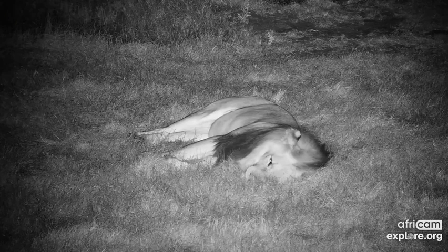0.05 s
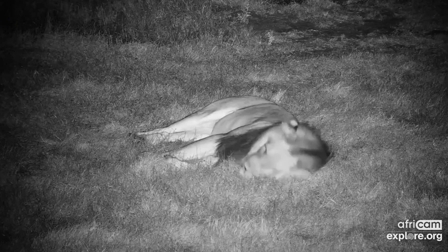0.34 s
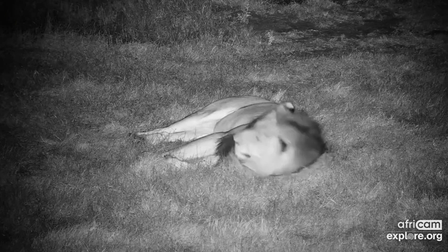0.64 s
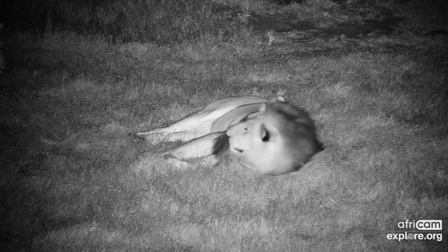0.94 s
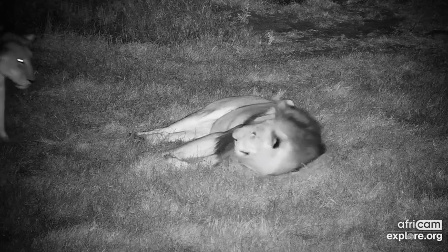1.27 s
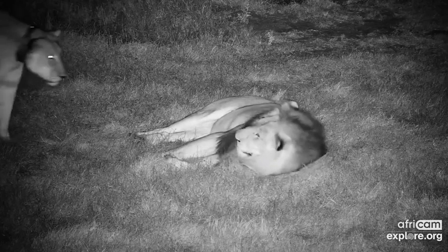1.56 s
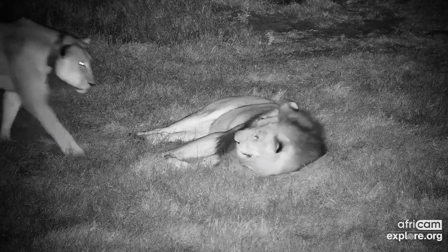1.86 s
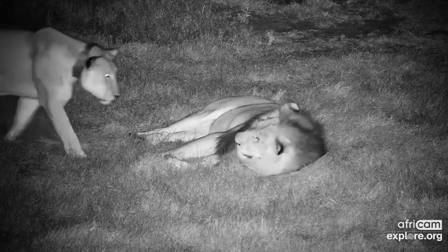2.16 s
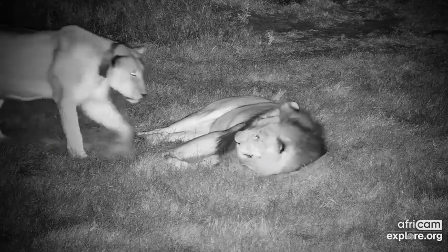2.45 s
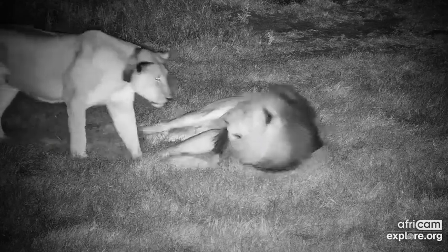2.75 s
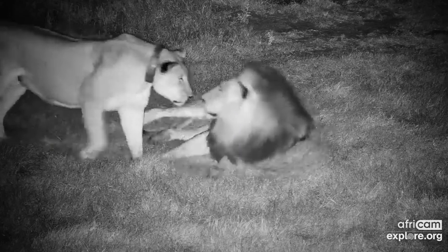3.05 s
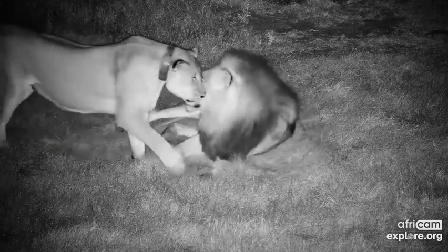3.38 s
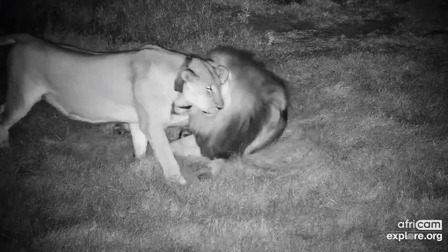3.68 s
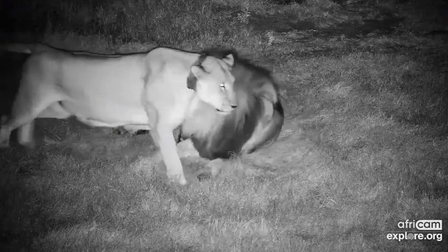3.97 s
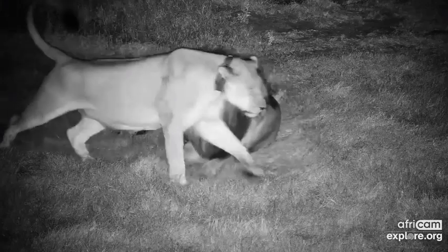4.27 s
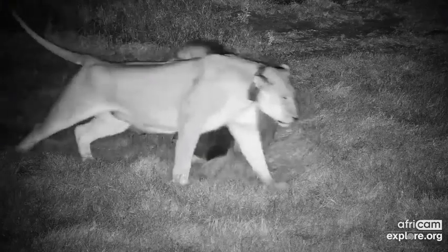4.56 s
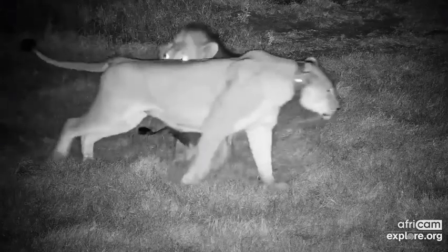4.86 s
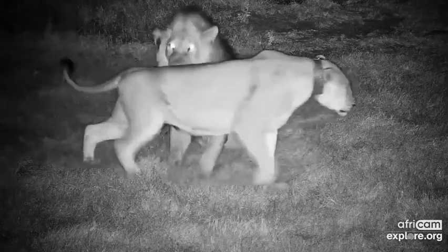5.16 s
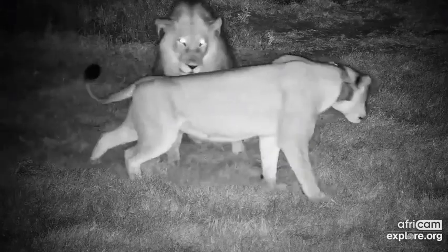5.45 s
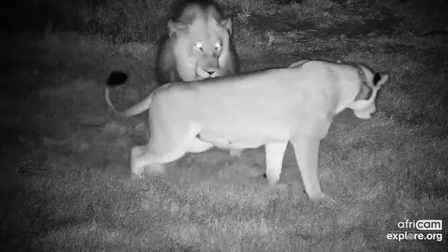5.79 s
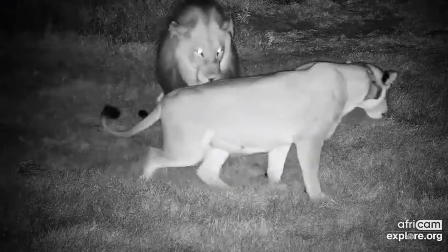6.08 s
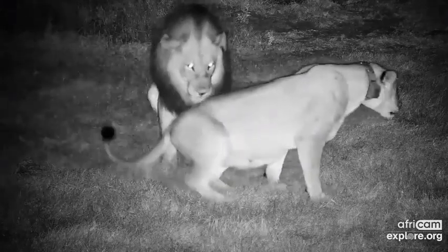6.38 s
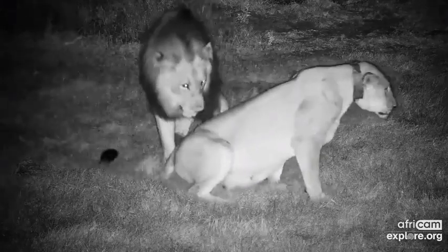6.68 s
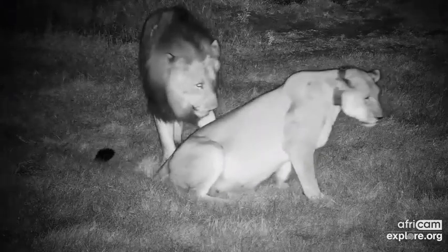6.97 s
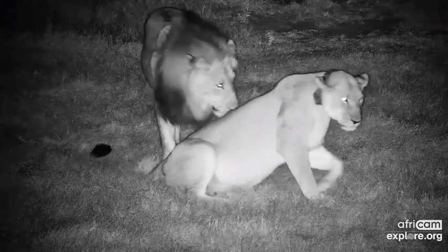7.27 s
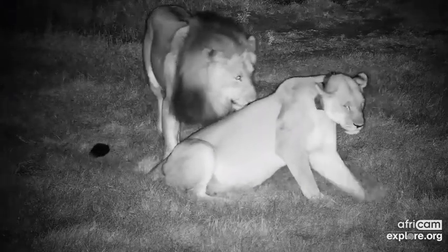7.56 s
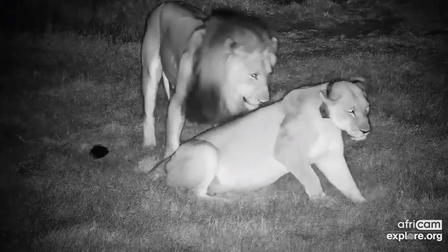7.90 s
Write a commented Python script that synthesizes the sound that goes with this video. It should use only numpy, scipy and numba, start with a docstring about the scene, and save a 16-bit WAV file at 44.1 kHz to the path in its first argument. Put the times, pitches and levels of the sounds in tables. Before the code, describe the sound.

A lion growls in slow, throaty swells over a constant high chorus of frogs, toads and chirping insects.

```python
"""Open bush at night, one distant microphone with faint mains hum.
Toads rattle in overlapping trains of tone pulses, insects rasp, a small caller repeats four falling chirps.
The treble near 5.5 kHz drops out briefly and flickers.
From about 2.7 s a lion growls in swells of effort: slow, separate vocal-fold flaps ring throat and
chest, louder and quicker at each crest, and change colour as the mouth opens."""
import sys
import numpy as np
from scipy import signal
from scipy.fft import rfft, irfft, next_fast_len
from scipy.io import wavfile
from scipy.ndimage import uniform_filter1d
from numba import njit

SR = 44100
rng = np.random.default_rng(int(sys.argv[2]) if len(sys.argv) > 2 else 0)


def dump_mix(stems):
    """Bounce the given channels to the path in sys.argv[1] as a 16-bit WAV at rate SR."""
    frames = np.atleast_2d(stems).T  # one column per channel
    limited = np.clip(frames, -1, 1)  # hard clip at full scale
    pcm = np.round(limited * 32767).astype(np.int16)
    wavfile.write(sys.argv[1], SR, pcm)


N = 349713
TIME = np.arange(N) / SR

# noise spectra: f/Hz, relative density/dB
AIR_SPECTRUM = [(20, -6), (70, -7), (130, -3), (210, -1.5), (290, -3.5), (370, -3.5), (600, 1), (760, 2),
                (1050, -0.5), (1270, -2), (2500, 7), (3600, -13.5), (7000, -10), (12500, -11)]
FROG_SPECTRUM = [(1300, -21.5), (1480, -7), (1650, 12.5), (1820, -5.5), (2000, 2), (2130, 0.5), (2480, 3.5),
                 (2700, -11), (2950, 0.5), (3170, -18), (3330, -3), (3550, -22.5), (3750, -22.5),
                 (3950, -3.5), (4300, -75)]
INSECT_SPECTRUM = [(3900, -34.5), (4250, -11), (4550, -4), (4950, 3), (5200, 0.5), (5380, 0), (5500, -36),
                   (5800, -50), (6050, 2.5), (6450, -7), (6700, -8.5), (7000, -21.5), (7800, -23)]
# hum lines: f/Hz, level/dB
HUM_LINES = [(50, -77.5), (100, -78), (150, -80.5), (250, -78), (290, -77)]
# the treble near 5.5 kHz drops out briefly: start/s, end/s
TREBLE_DROPOUTS = [(0, .023), (.048, .075), (.192, .215), (.482, .507), (.842, .868), (1.2, 1.224),
                   (1.61, 1.75), (1.779, 1.801), (2.043, 2.086), (2.452, 2.475), (2.592, 2.616),
                   (2.64, 2.665), (2.86, 2.886), (2.906, 2.931), (3.122, 3.286), (3.51, 3.555),
                   (3.65, 3.695), (3.72, 3.77), (3.94, 3.986), (4.13, 4.177), (4.293, 4.322),
                   (4.347, 4.414), (4.73, 4.753), (5.232, 5.257), (5.303, 5.329), (5.428, 5.473),
                   (5.5, 5.523), (5.69, 5.76), (6.002, 6.07), (6.41, 6.46), (6.48, 6.527), (6.553, 6.578),
                   (6.698, 6.746), (6.837, 6.863), (6.89, 6.914), (7.036, 7.102), (7.54, 7.574),
                   (7.632, 7.657), (7.68, 7.73), (7.796, 7.846)]
# four-note calls: start/s
CALL_STARTS_S = [-.063, .365, .75, 1.22, 1.613, 1.991, 2.393, 2.8, 3.162, 3.551, 4.018, 4.383, 4.761, 5.138,
                 5.591, 5.988, 6.403, 6.78, 7.144, 7.532, 7.9]
# notes within a call: delay/s
NOTE_DELAYS_S = (.001, .044, .088, .133)
# far toad groups: f/Hz, spread/Hz, pulse rate/Hz, level/dB
FAR_TOADS = [(1637, 88, 47, -58.8), (2006, 7.3, 48, -68), (2370, 88, 60, -65)]
# near toads: start/s, end/s, f/Hz, pulse rate/Hz, relative level/dB, roughness/cycles, fall/(Hz/s)
NEAR_TOADS = [(-0.1, 3.95, 1660, 55.5, -56.2, .15, 0), (5.3, 7.7, 1660, 55.3, -56.2, .15, 0),
              (-0.1, 4.5, 2335, 45.4, -55.6, .08, 42000), (4.4, 5.8, 2270, 45.4, -58, .08, 30000),
              (5.7, 8.2, 2260, 45.35, -55.7, .06, 10000), (5.7, 8.2, 2440, 45.4, -61, .1, 0),
              (-0.1, 8.2, 2370, 50.45, -56.4, .06, 0), (1.3, 8.2, 2480, 48.4, -63.5, .15, 0),
              (3.9, 5.35, 1630, 48, -58, .25, 0)]
# throat resonances, mouth shut: f/Hz, width/Hz, gain/dB
THROAT_MODES = [(513, 336, -7.5), (747, 320, -1), (994, 240, -16)]
# resonances, mouth open: start/s, end/s, low f/Hz, high f/Hz, low gain/dB, mid gain/dB, high gain/dB
MOUTH_OPENINGS = [(2.58, 2.77, 524, 1370, -10, 1, 1), (3.2, 4.0, 480, 1116, -11, -1, -7),
                  (4.37, 4.76, 484, 1160, -5.5, -14, 1), (5.42, 5.62, 483, 1220, -4, -7, -12.5),
                  (5.92, 6.39, 572, 920, -3.5, -1, -9), (6.35, 6.55, 500, 1250, -0.5, -18, -16),
                  (6.51, 6.78, 456, 870, -1.5, -4, -9), (7.26, 7.49, 473, 1170, 0, -20, -6),
                  (7.45, 7.8, 500, 1100, 2.5, -30, -12), (7.76, 8.1, 486, 1350, -3, -11, -7.5)]
# growls, relative levels: start/s, crest/s, end/s, flap count, voice/dB, chest/dB, rasp/dB
GROWL_SWELLS = [(2.671, 2.675, 2.712, 2, -58, -73, -76), (2.808, 2.855, 2.985, 5, -53, -78, -71),
                (3.072, 3.08, 3.131, 2, -50, -79, -64), (3.257, 3.28, 3.438, 5, -47, -70, -67),
                (3.480, 3.60, 3.727, 7, -46, -64, -59.5), (3.768, 3.81, 3.900, 4, -45.5, -65, -62),
                (4.100, 4.38, 4.524, 11, -44, -63, -66.5), (4.569, 4.65, 4.841, 7, -45.5, -67, -69),
                (4.888, 5.12, 5.258, 9, -47.5, -67, -74), (5.303, 5.46, 5.658, 9, -41.5, -62, -73),
                (5.806, 6.00, 6.187, 10, -46, -63, -71), (6.232, 6.34, 6.527, 8, -42.5, -61, -71),
                (6.574, 6.62, 6.907, 8, -44, -63.5, -79), (6.957, 7.18, 7.256, 7, -46, -63.5, -76),
                (7.307, 7.35, 7.490, 5, -41.5, -61, -70), (7.546, 7.90, 7.970, 10, -42, -59.5, -68)]
# hardest flaps, heard as knocks: t/s, relative level/dB
HARD_FLAPS = [(2.669, -40.5), (4.273, -42), (4.313, -38), (4.353, -40.5), (4.438, -42.5), (4.478, -43.5),
              (4.655, -45), (5.302, -40), (5.388, -43.5), (5.472, -39.5), (5.556, -40.5), (5.891, -44),
              (5.973, -36), (6.051, -37.5), (6.135, -43), (6.228, -40), (6.311, -35.5), (6.392, -36.5),
              (6.478, -41), (7.348, -39), (7.834, -39), (7.878, -34)]


def from_db(db):
    return 10 ** (np.asarray(db) / 20)


def unit_rms(x):
    return x / np.sqrt(np.mean(x ** 2) + 1e-20)


def trapezoid(t, start, end, edge_s):
    return np.clip(np.minimum(t - start, end - t) / edge_s, 0, 1)


def band(x, low_hz, high_hz):
    return signal.sosfilt(signal.butter(2, [low_hz, high_hz], "band", fs=SR, output="sos"), x)


def drift(rate_hz):
    """Smooth random motion, rms 1."""
    hop, settle = 40, 2000
    pole = np.exp(-2 * np.pi * rate_hz * hop / SR)
    white = rng.standard_normal(N // hop + settle + 2)
    slow = signal.lfilter([1], [1, -2 * pole, pole * pole], white)[settle:]
    return np.interp(np.arange(N) / hop, np.arange(len(slow)), unit_rms(slow))


def noise(spectrum):
    """Coloured noise, rms 1."""
    hz, level_db = np.transpose(spectrum)
    size = next_fast_len(N)
    bins_hz = np.maximum(np.arange(size // 2 + 1) * SR / size, 1)
    gain = from_db(np.interp(np.log(bins_hz), np.log(hz), level_db))
    return unit_rms(irfft(rfft(rng.standard_normal(size)) * gain, size)[:N])


@njit
def ring(drive, hz, width_hz):
    """Three moving resonators in series; a unit click swells to about 1 and dies."""
    out = np.zeros(len(drive))
    first = second = third = 0j
    decay = np.exp(-np.pi * width_hz / SR)
    for i in range(len(drive)):
        pole = decay * np.exp(2j * np.pi * hz[i] / SR)
        first = first * pole + drive[i] + 1e-18
        second = second * pole + first * (1 - decay)
        third = third * pole + second * (1 - decay)
        out[i] = third.imag * np.e ** 2 / 2
    return out


def background(air_db, frogs_db, waver_db):
    """Still air, wash of the farthest frogs, wavering mains hum."""
    hum = np.zeros(N)
    for hz, level_db in HUM_LINES:
        peak = np.sqrt(2) * from_db(level_db + waver_db * drift(0.97))
        hum += peak * np.sin(2 * np.pi * (hz * TIME + rng.random()))
    return from_db(air_db) * noise(AIR_SPECTRUM) + from_db(frogs_db) * noise(FROG_SPECTRUM) + hum


def insects(level_db):
    """Wide rasping bed of many insects."""
    return from_db(level_db + 2.2 * drift(77)) * noise(INSECT_SPECTRUM)


def flickering_treble(level_db, dropout_db, flickers_per_s=2, flicker_s=.015):
    """The treble near 5.5 kHz drops out briefly and flickers."""
    flickers = [(at, at + flicker_s) for at in rng.uniform(0, N / SR, int(flickers_per_s * N / SR))]
    gate_db = np.zeros(N)
    for start, end in TREBLE_DROPOUTS + flickers:
        gate_db[int(start * SR):int(end * SR)] = -dropout_db
    gate = uniform_filter1d(from_db(gate_db), size=220)
    treble = gate * from_db(1.2 * drift(25)) * band(rng.standard_normal(N), 5336, 5800)
    return from_db(level_db) * unit_rms(treble)


def chirper(level_db, top_hz, fall_hz, note_s, sag_hz, scatter_hz):
    """Small caller: four abrupt falling whistles, pitch sagging from note to note."""
    out = np.zeros(N)
    waver_hz, grain_db = 38 * drift(170), 1.6 * drift(200)
    for call_start in CALL_STARTS_S:
        for k, delay in enumerate(NOTE_DELAYS_S):
            uneven_db, detune = rng.standard_normal(2)
            start = call_start + delay
            span = np.arange(max(int(start * SR), 0), min(int((start + note_s) * SR), N))
            age = span / SR - start
            hz = top_hz - sag_hz * k + scatter_hz * detune + waver_hz[span] - fall_hz * age / note_s
            gain = from_db(level_db + uneven_db + grain_db[span]) * trapezoid(age, 0, note_s, .0015)
            out[span] += gain * np.sin(2 * np.pi * np.cumsum(hz) / SR)
    return out


def trill(hz, pulse_hz, pulse_s, uneven_db, wobble, scatter_hz, rough, fall_hz_per_s=0):
    """Toad rattle, rms 1: short tone pulses; random phase (rough) blurs their comb of lines."""
    rate_hz = pulse_hz * (1 + wobble * drift(2))
    cycles = np.cumsum(rate_hz) / SR + rng.random()
    pulse = cycles.astype(int) % 1024
    age = (cycles % 1 - .5) / rate_hz   # zero at the pulse peak
    strength, detune, phase = rng.standard_normal((1024, 3))[pulse].T
    width_s = pulse_s * np.where(age < 0, .62, 1)   # rise faster than decay
    envelope = np.exp(-(age / width_s) ** 2) * from_db(uneven_db * np.minimum(strength, 1))
    mean_hz = hz + scatter_hz * detune - fall_hz_per_s * age / 2
    return unit_rms(envelope * np.sin(2 * np.pi * (mean_hz * age + rough * phase)))


def far_toads(group_size):
    """Groups of rattles at loosely held rates, blurring together."""
    out = np.zeros(N)
    for hz, spread_hz, pulse_hz, level_db in FAR_TOADS:
        voices = sum(trill(hz + spread_hz * offset, pulse_hz * (1 + .2 * offset), pulse_s=.0061,
                           uneven_db=0, wobble=.1, scatter_hz=41.2, rough=.55)
                     for offset in np.linspace(-1, 1, group_size))
        out += from_db(level_db) * unit_rms(voices)
    return out


def near_toads(gain_db, fade_s):
    """Single voices, close enough for their pulse rates to stand out."""
    out = np.zeros(N)
    for start, end, hz, pulse_hz, level_db, rough, fall in NEAR_TOADS:
        pulse_s = 6 / hz * (1 + fall / 60000)   # six cycles, longer if sliding
        rattle = trill(hz, pulse_hz, pulse_s, uneven_db=1.2, wobble=.004, scatter_hz=12,
                       rough=rough, fall_hz_per_s=fall)
        out += from_db(gain_db + level_db) * trapezoid(TIME, start, end, fade_s) * rattle
    return out


def effort(t, start, crest, end, margin_s=.057):
    """Rounded 0-1-0 swell; builds before the first flap, outlasts the last."""
    return np.sin(np.pi / 2 * np.interp(t, [start - margin_s, crest, end + margin_s], [0, 1, 0]))


def effort_gains(chest_swell_db, rasp_swell_db):
    """Chest boom and rasp both swell with each growl's effort."""
    chest_gain, rasp_gain = np.zeros((2, N))
    for start, crest, end, _, _, chest_db, rasp_db in GROWL_SWELLS:
        push = effort(TIME, start, crest, end)
        chest_gain = np.maximum(chest_gain, (push > 0) * from_db(chest_db - chest_swell_db * (1 - push)))
        rasp_gain = np.maximum(rasp_gain, (push > 0) * from_db(rasp_db - rasp_swell_db * (1 - push)))
    return chest_gain, rasp_gain


def flaps(rest_db, hurry, knock_gain_db, lead_s=.003455, clear_s=.015):
    """One click per vocal-fold flap, louder and quicker with effort; a few knock hard."""
    clicks = np.zeros(N + SR)
    for start, crest, end, count, voice_db, _, _ in GROWL_SWELLS:
        even_s = np.linspace(start, end, count)
        gaps = 1 - hurry * effort((even_s[1:] + even_s[:-1]) / 2, start, crest, end)
        at = start + (end - start) * np.append(0, np.cumsum(gaps)) / gaps.sum()
        level_db = rest_db + (voice_db - rest_db) * effort(at, start, crest, end)
        clicks[((at - lead_s) * SR).astype(int)] = from_db(level_db + rng.standard_normal(count))
    for at, level_db in HARD_FLAPS:
        clicks[int((at - clear_s) * SR):int((at + clear_s) * SR)] = 0   # a knock replaces nearby flaps
        clicks[int(at * SR)] = from_db(level_db + knock_gain_db)
    return clicks[:N]


def chest(clicks, hz, width_hz):
    """Levelled chest boom; answers weak flaps almost as fully as strong ones."""
    boom = band(ring(np.sqrt(clicks), np.full(N, hz), width_hz), 110, 900)
    return boom / np.sqrt(uniform_filter1d(boom ** 2, size=8000) + 1e-7)


def throat(drive, jaw_s):
    """Three resonances glide as the mouth opens and shuts; the middle one holds its pitch."""
    openness = [trapezoid(TIME, start, end, jaw_s) for start, end, *_ in MOUTH_OPENINGS]
    _, _, low_hz, high_hz, *open_db = np.transpose(MOUTH_OPENINGS)
    open_hz = low_hz, np.full(len(MOUTH_OPENINGS), THROAT_MODES[1][0]), high_hz
    out = np.zeros(N)
    for k, (shut_hz, width_hz, shut_db) in enumerate(THROAT_MODES):
        hz = shut_hz + (open_hz[k] - shut_hz) @ openness
        gain_db = shut_db + (open_db[k] - shut_db) @ openness
        out += (-1) ** k * from_db(gain_db) * ring(drive, hz, width_hz)
    return band(out, 290, 2800)   # the mouth radiates lows poorly


def lion(voice_db, rasp_db, puff_db, puff_width_hz, chest_db, echo_db, echo_s):
    """Flaps, their dying puffs of turbulence and a rasp ring the throat; the chest booms below."""
    clicks = flaps(rest_db=-49.5, hurry=.1685, knock_gain_db=1.5)
    puffs = signal.lfilter([1], [1, -np.exp(-np.pi * puff_width_hz / SR)], clicks + 1e-18)
    chest_gain, rasp_gain = effort_gains(chest_swell_db=7.5, rasp_swell_db=16.5)
    turbulence = (from_db(puff_db) * puffs + from_db(rasp_db) * rasp_gain) * rng.standard_normal(N)
    voice = throat(from_db(voice_db) * clicks + turbulence, jaw_s=.031)
    ground_echo = from_db(echo_db) * np.interp(TIME - echo_s, TIME, voice, left=0)
    boom = from_db(chest_db) * chest_gain * chest(clicks, hz=143, width_hz=108)
    return voice + ground_echo + boom


def scene():
    mono = lion(voice_db=-2.5, rasp_db=-14.5, puff_db=-28, puff_width_hz=90, chest_db=-.5,
                echo_db=-13.5, echo_s=.004)
    mono += near_toads(gain_db=-1, fade_s=.056) + far_toads(group_size=4)
    mono += chirper(level_db=-54, top_hz=4644, fall_hz=303, note_s=.0257, sag_hz=12, scatter_hz=19)
    mono += insects(level_db=-58) + flickering_treble(level_db=-55, dropout_db=32)
    mono += background(air_db=-56.5, frogs_db=-55.5, waver_db=2.5)
    return np.array([mono, mono])


def record(dry):
    """Steep low-pass at 12250 Hz."""
    return signal.sosfilt(signal.ellip(12, .1, 70, 12250, fs=SR, output="sos"), dry)


dry = scene()
out = record(dry)
dump_mix(out)
```